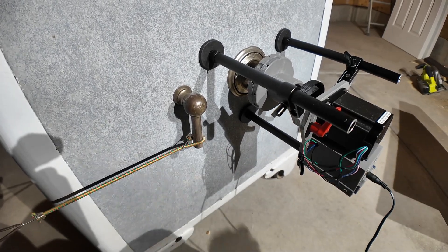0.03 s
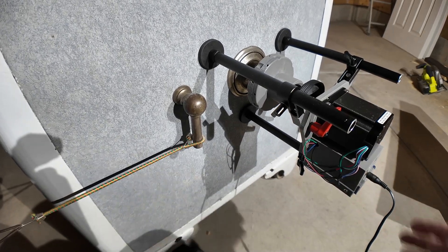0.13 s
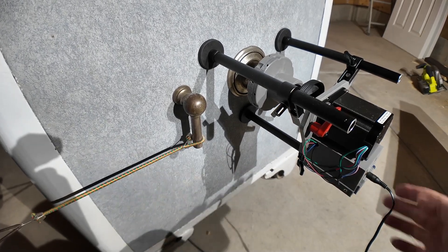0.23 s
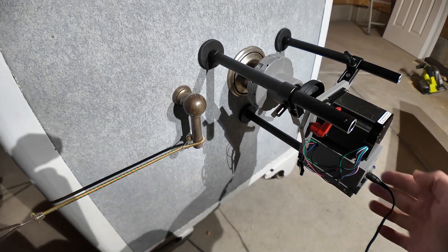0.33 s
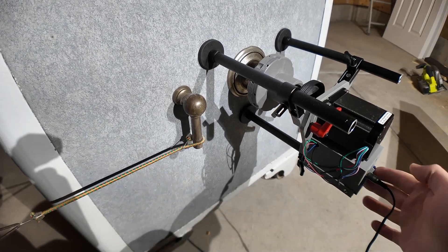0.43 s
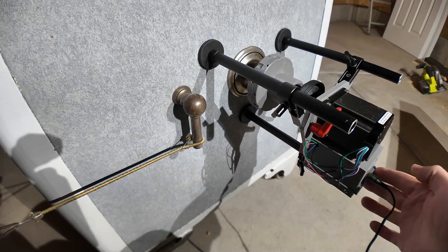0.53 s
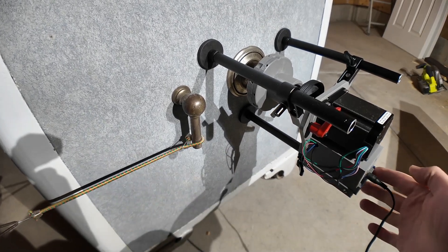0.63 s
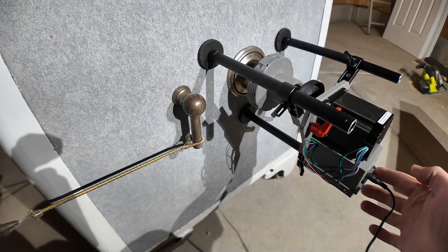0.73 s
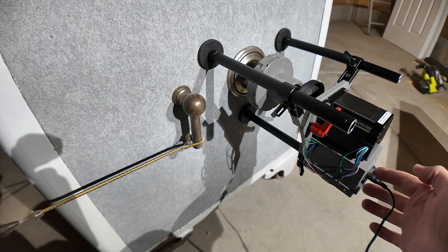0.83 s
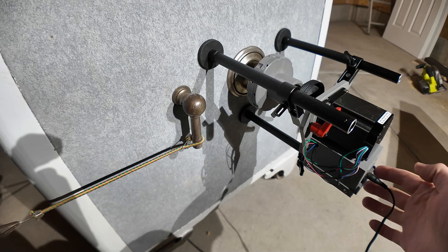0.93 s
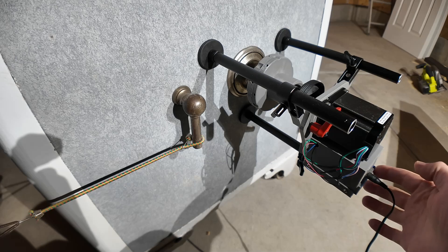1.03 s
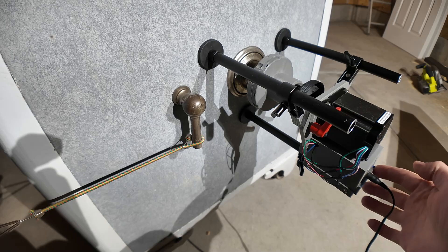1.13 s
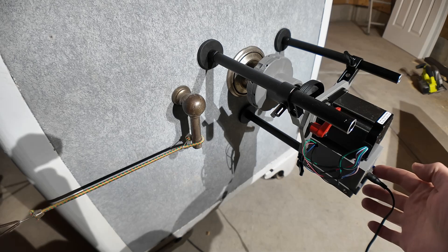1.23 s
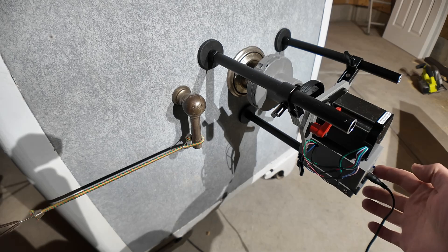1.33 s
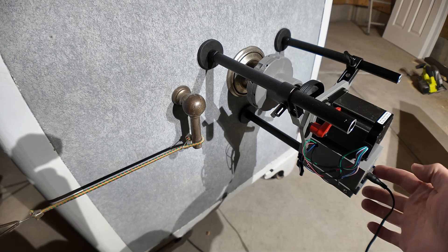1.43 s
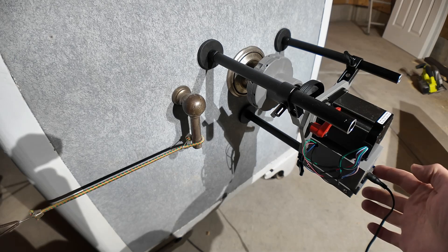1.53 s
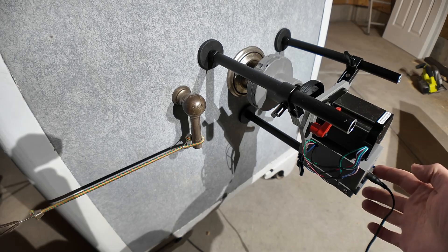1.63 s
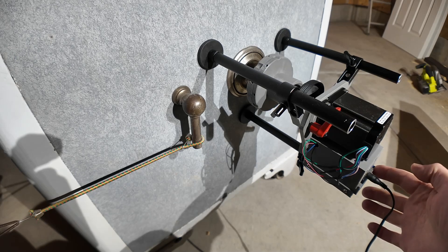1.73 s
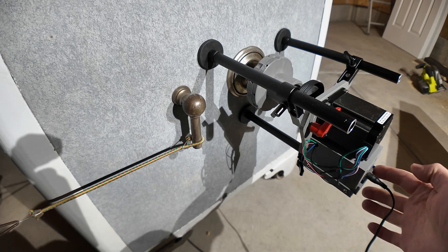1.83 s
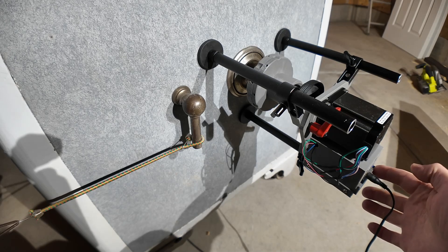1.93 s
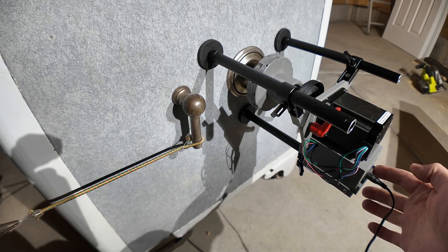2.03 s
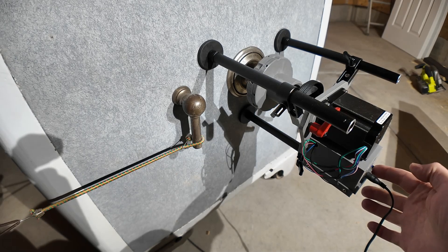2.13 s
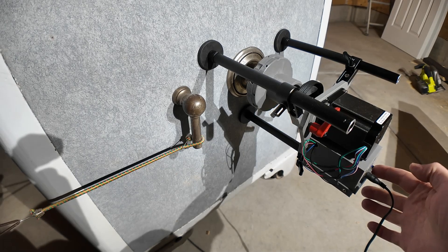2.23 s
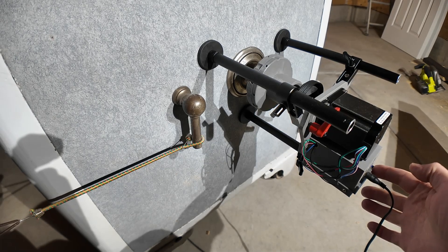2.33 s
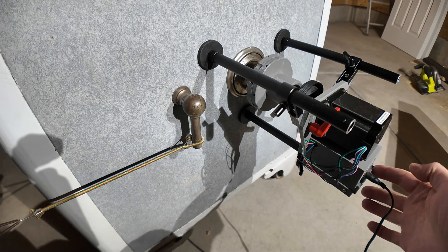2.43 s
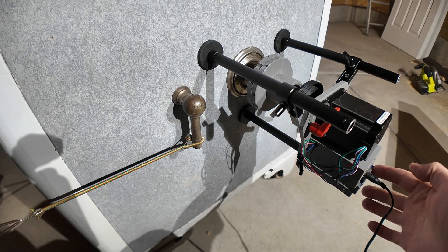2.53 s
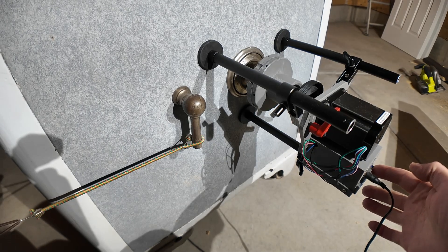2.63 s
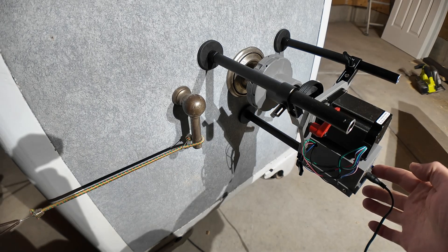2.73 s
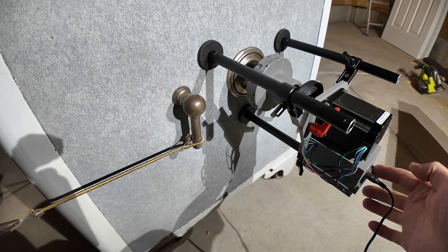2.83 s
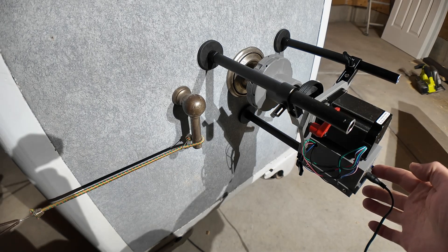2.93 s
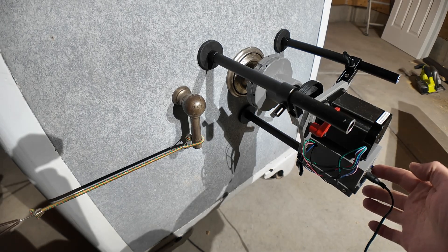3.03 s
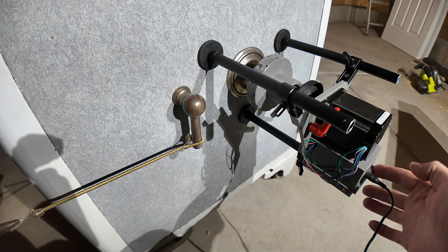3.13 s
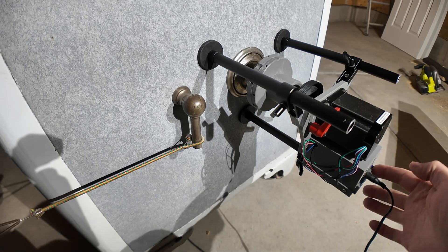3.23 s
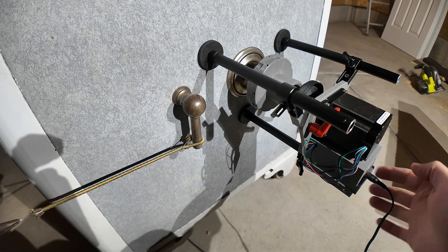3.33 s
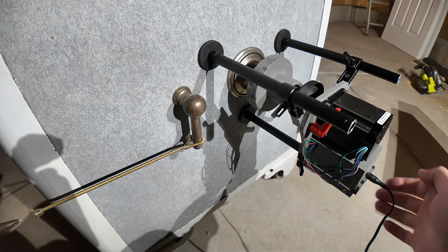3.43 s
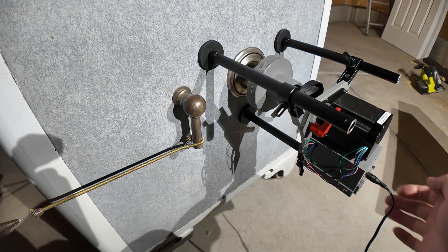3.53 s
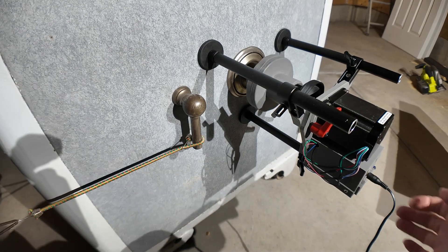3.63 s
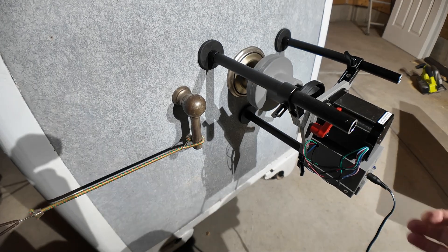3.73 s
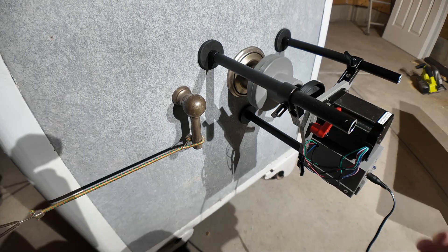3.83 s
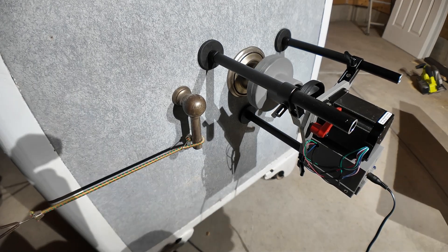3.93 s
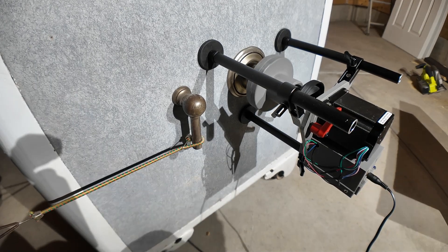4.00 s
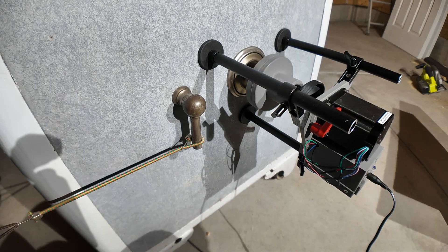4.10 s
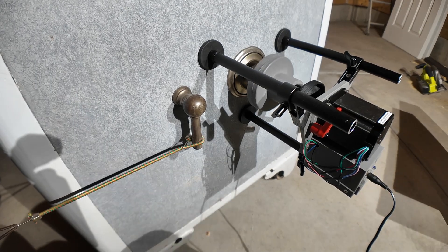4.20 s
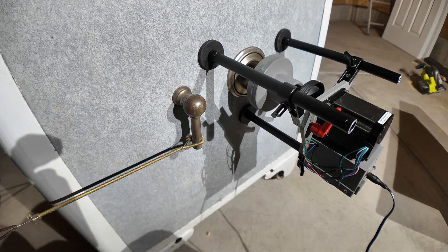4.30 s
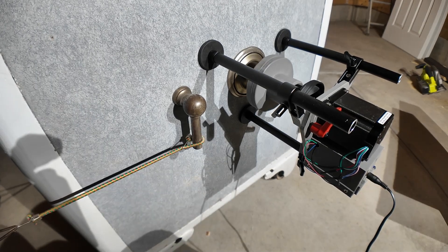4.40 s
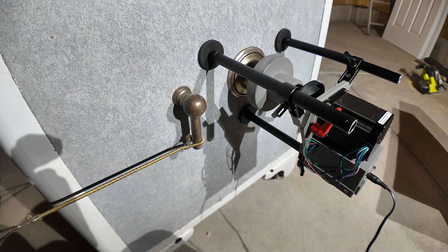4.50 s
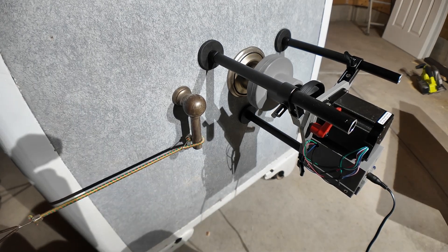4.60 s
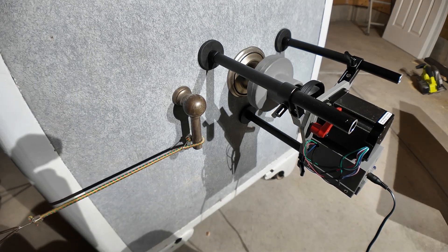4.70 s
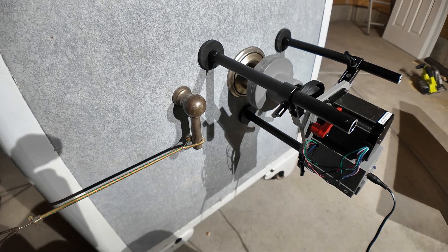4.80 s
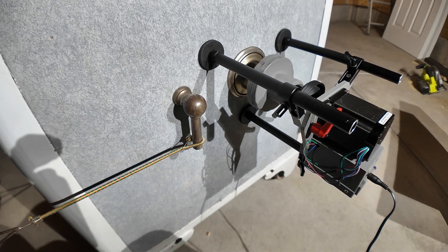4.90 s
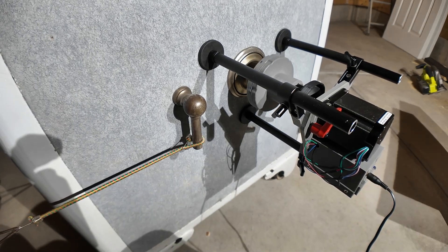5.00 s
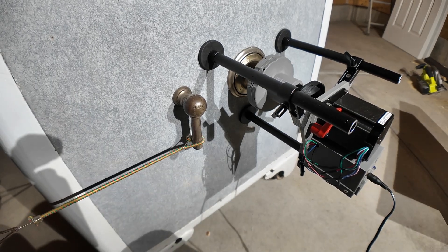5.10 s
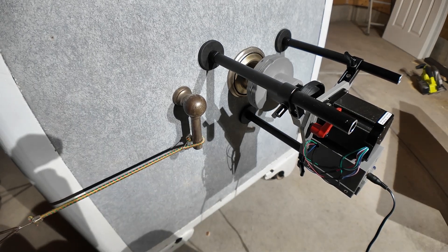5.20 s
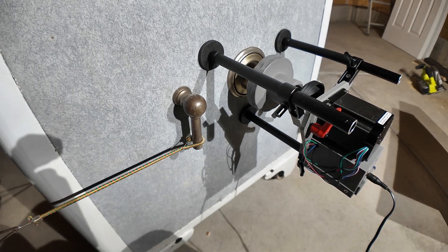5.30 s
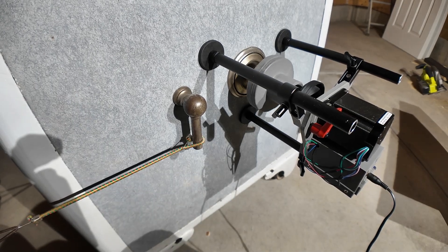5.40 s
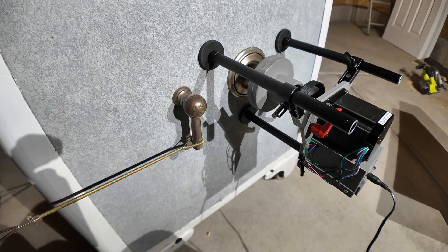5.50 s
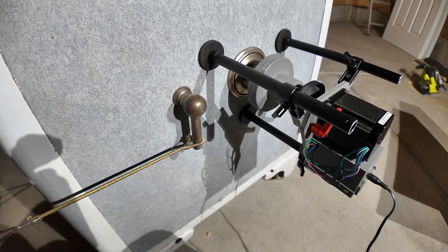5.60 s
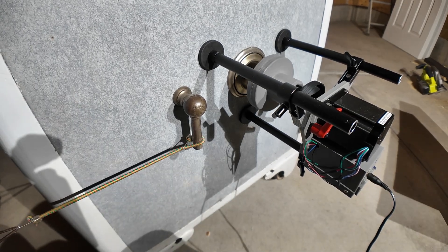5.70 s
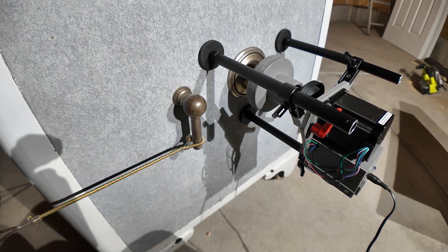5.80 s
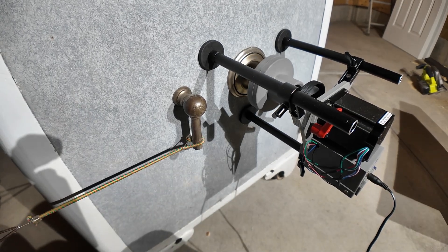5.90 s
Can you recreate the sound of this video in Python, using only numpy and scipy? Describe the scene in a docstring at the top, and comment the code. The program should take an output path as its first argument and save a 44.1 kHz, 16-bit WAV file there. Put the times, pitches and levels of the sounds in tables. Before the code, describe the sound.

Close up, several light plastic and metal clicks with a firmer knock ring briefly through a bracket. Near silence follows, with low room rumble and mains hum. Then a stepper motor buzzes up in pitch, gears chattering and a lock ticking faintly over a thin high whistle. It glides down almost to a stop, rises again and holds its steady whirring whine in a lightly echoing basement.

```python
"""A small stepper motor, clamped to a safe door in a basement, is plugged in and spins the lock dial.
First come filtered-noise air and mains harmonics, then impulses ringing board and bracket as the plug goes in.
The motor creeps, ramps up, cruises, brakes to a creep and ramps up for a second move, cruising to the end:
sines at multiples of the step rate hum and whine through the frame's resonances, random impacts rattle the
gears, impulses and noise bursts make the lock tick and chatter, and the driver whistles and hisses thinly."""
import sys
import numpy as np
from scipy import signal
from scipy.fft import rfft, irfft
from scipy.io import wavfile
from scipy.ndimage import uniform_filter1d

SR = 44100
rng = np.random.default_rng(int(sys.argv[2]) if len(sys.argv) > 2 else 0)


def put_to_file(sound):
    """Save the sound as 16-bit audio at rate SR, in the file named by the first command-line argument."""
    columns = np.atleast_2d(sound).T  # one column per channel
    safe = np.clip(columns, -1, 1)
    whole_steps = np.round(safe * 32767)
    wavfile.write(sys.argv[1], SR, whole_steps.astype(np.int16))


N = 262395
TIME = np.arange(N) / SR
FREQS = np.maximum(np.arange(N + 1) * SR / (2 * N), 1)

# All levels are relative.
# spectrum of the room air: (frequency [Hz], density [dB per Hz])
AIR_SPECTRUM = [(18, -56), (30, -39), (47, -3), (88, -3), (118, -6.5), (149, -13.5), (189, -9),
                (215, -22.5), (259, -17.5), (374, -25), (684, -24.5), (889, -26.5), (3870, -30.5),
                (7870, -39.5), (16000, -37.5)]
AIR_DB = -67.5   # rms level of the air above 410 Hz
# stereo spread of the room air: (frequency [Hz], side minus mid [dB])
AIR_WIDTH = [(60, -13), (110, -10), (200, -3), (380, 5.5), (700, 0.5), (1290, 0), (2380, 0), (4400, 1),
             (8120, 0), (15000, 1)]
# swells of the second mains harmonic: (time [s], length [s], level [dB])
MAINS_SWELLS = [(1.28, 0.12, -62.5), (1.78, .06, -59.5), (2.23, 0.18, -56.5)]
# the third mains harmonic fades in and stays
THIRD_FROM_S, THIRD_FADE_S, THIRD_DB = 2.65, 0.4, -59

# dull thumps of the door: (time [s], length [s], level [dB])
DOOR_THUMPS = [(3.41, 0.03, -50), (3.89, 0.067, -53.5), (4.07, 0.0078, -41.5), (4.105, 0.013, -42)]
# the bracket rings up once: (time [s], length [s], level [dB])
BRACKET_RING = [(4.137, 0.0035, -23)]

# the power plug is pushed home: (time [s], thud level [dB], snap level [dB])
PLUG_CONTACTS = [(0.516, -19, -3), (0.706, 1.5, -5.5), (0.821, 7.5, 13), (1.004, -37, -4), (1.204, 4, -21),
                 (1.212, -12, -2)]
# board and bracket excited by the thud: (frequency [Hz], width [Hz], level [dB])
THUD_MODES = [(598, 57, -3), (744, 83, 7), (1030, 180, -1.5), (1290, 76, -19)]
# board and bracket excited by the snap: (frequency [Hz], width [Hz], level [dB])
SNAP_MODES = [(1190, 170, 5.5), (2300, 880, -3), (3700, 530, -9)]

# ticks of the lock and coupling: (time [s], peak level [dB], treble level [dB])
LOCK_TICKS = [(3.378, -13, -40), (3.389, -27, -17), (3.408, -17.5, -16.5), (3.568, -20, -24),
              (3.624, -14, -26), (3.711, -16, -15.5), (3.778, -9.5, -30), (3.796, -14, -19),
              (3.847, -15, -32), (3.858, -6, -27), (4.173, -19, -35), (4.329, -20, -32),
              (4.362, -11.5, -29), (5.3, -12.5, -25.5), (5.65, -3.5, -52), (5.829, -9, -51),
              (5.875, -18.5, -11.5), (5.925, -9, -39)]
# chatters of the coupling: (time [s], length [s], level [dB])
COUPLING_CHATTER = [(3.381, 0.0036, -40), (3.411, 0.0036, -43), (3.469, 0.0041, -25), (3.78, 0.00092, -39),
                    (5.306, 0.0027, -51), (5.58, 0.0075, -35.5), (5.945, 0.0043, -35.5)]
# resonances of the coupling: (frequency [Hz], width [Hz], level [dB])
COUPLING_MODES = [(2250, 500, 6), (3260, 750, 0.5), (4820, 230, 5), (6300, 460, -4.5), (8600, 840, -15)]

# driver whistles: (lowest pitch before jitter [Hz], swing [Hz], level [dB])
CHOPPER_TONES = [(11890, 430, -57), (14550, 650, -57)]

# moves of the dial, one each way: (start [s], stop [s], rattle level [dB], hum level while speeding up [dB])
DIAL_MOVES = [(3.403, 5.19, 0.5, -6), (5.19, 7.0, -1.5, -2.5)]
# rates in full steps per second; ramping up and braking are equally steep
CREEP_HZ, CRUISE_HZ, RAMP_HZ_PER_S = 12, 531.4, 1240
START_S = 3.376
# the rotor falls behind for an instant and catches up: (time [s], lag [steps])
ROTOR_STUMBLES = [(3.856, 0.6), (3.978, 0.46), (4.161, 0.29), (4.212, 0.5), (4.536, 0.5)]

# spectrum of gears and lock ticks: (frequency [Hz], density [dB per Hz])
GEAR_SPECTRUM = [(380, -28), (520, 2.5), (700, 5), (866, -7), (1090, -2), (1600, 1.5), (1960, -0.5),
                 (2270, 2), (2920, -6.5), (3850, -4.5), (6360, -29.5), (11500, -33.5), (12400, -63),
                 (14000, -47)]
# narrow rings of gears and bracket: (frequency [Hz], width [Hz], level above the rest [dB])
GEAR_MODES = [(684, 26, -40), (1253, 38, 2), (1372, 120, 7), (1620, 45, -19), (1793, 114, -1),
              (2260, 88, -5), (3170, 230, -7.5), (3506, 21, 6.5), (4030, 73, -19), (4430, 160, -8),
              (5200, 150, -1)]
# (dB at full speed before each move's offset, dB lost at a standstill)
CLATTER, RATTLE_BODY, EDGES = (-42, 0), (-34.5, 11.4), (-41.5, 22.5)
# above this step rate the gears break loose; below it they are quieter
LOOSE_HZ, LOOSE_WIDTH_HZ, SEATED_DB = 458, 8.2, -1
# sudden flurries when the gears cross their play:
# (time [s], decay [s], clatter gain [dB], rattle gain [dB])
GEAR_FLURRIES = [(3.376, 0.13, 7, 8), (3.623, 0.04, 6.5, 7.5), (3.778, 0.073, 8, 6), (4.127, 0.012, 10, 1),
                 (4.726, 0.023, 4, 3), (4.914, 0.02, 13, 2.5), (5.151, 0.064, 8.5, 6),
                 (5.576, 0.021, 7.5, 7), (5.645, 0.015, 3, 1), (5.785, 0.015, 0, 8.5)]

# how hard the steps shake the door at full speed: (time [s], hum level [dB])
CRUISE_HUM = [(3.82, -32), (3.944, -29), (3.988, -30), (4.11, -23), (4.142, -23.5), (4.172, -33.5),
              (4.33, -27), (4.38, -30.5), (4.5, -21.5), (4.552, -31.5), (4.59, -25.5), (4.78, -32.5),
              (5.62, -39.5), (5.632, -31), (5.708, -48.5), (5.862, -30), (5.898, -48.5), (5.94, -39.5)]
# how the door answers the step rate on the ramps: (step rate [Hz], hum level [dB])
DOOR_RESPONSE = [(60, -68), (150, -55), (245, -42.5), (320, -57), (400, -47.5), (450, -44), (533, -31)]
# low resonances of the door: (frequency [Hz], width [Hz], level [dB])
LOW_DOOR_MODES = [(87.6, 5, 12.5), (146.6, 2.2, 17)]

# overtones of the hum: (multiple of the step rate, level [dB])
HUM_OVERTONES = [(2, -3), (2.65, -7.5), (3, 2.5), (4, -2), (4.33, -4.5), (5, -4), (6, -3.5), (7, -8),
                 (7.25, -4.5)]
# ripple of the steps and microsteps: (multiple of the step rate, level [dB])
STEP_RIPPLE = [(2, -7), (7, -11.5), (8, 1.5), (9, -11), (16, -4.5), (24, -7.5), (32, -18)]
# resonances of the frame, the last one broad: (frequency [Hz], width [Hz], level [dB])
FRAME_MODES = [(720, 103, -6.5), (844, 97, -16), (1240, 66, -0.5), (1510, 60, -6.5), (2000, 270, -8.5),
               (2790, 32, -9.5), (3240, 170, -9.5), (4170, 190, -19.5), (2270, 2000, -15.5)]
# drive of the whine at full speed, and what it gains at a standstill
WHINE_DB, WHINE_SLOW_DB = -33.5, 5
# the rotor falls into resonance and the whine surges: (time [s], length [s], gain [dB])
WHINE_SURGES = [(3.469, 0.01, 12.5), (3.518, 0.0056, 10.5), (4.931, 0.022, 9), (5.151, 0.043, 5),
                (5.3, .007, 8.5)]

# stereo spread of the machine: (frequency [Hz], side minus mid [dB])
MACHINE_WIDTH = [(60, -13), (110, -28), (200, -5), (380, -17), (700, -8.5), (1290, -10.5), (2380, -4.5),
                 (4400, -5), (8120, 3.5), (15000, -1)]
# stereo balance of the machine: (frequency [Hz], left minus right [dB])
MACHINE_LEAN = [(60, 3.5), (110, -1.5), (200, 0.5), (380, 0), (700, 0.3), (1290, 1), (2380, -0.6),
                (4400, 2), (8120, 2), (15000, -4.5)]
CUTOFF_HZ = 15800


def from_db(db):
    """Logarithmic level: decibels to amplitude gain."""
    return 10 ** (np.asarray(db) / 20)


def rms_one(x):
    """Power normalization: scale to unit mean square."""
    return x / np.sqrt(np.mean(x ** 2) + 1e-20)


def bell(x, centre, width):
    """Gaussian pulse of height one."""
    return np.exp(-.5 * ((x - centre) / width) ** 2)


def swells(rows):
    """Superposed Gaussian envelopes of (time, length, level)."""
    return sum(from_db(db) * bell(TIME, s, length) for s, length, db in rows)


def drift(rate):
    """Slow random modulation: interpolated normal knots, `rate` per second, scaled to unit rms."""
    knots = rng.standard_normal(N)
    return rms_one(np.interp(TIME * rate, np.arange(N), knots))


def at_hz(points):
    """Spectral interpolation in dB along a logarithmic frequency axis."""
    hz, db = np.transpose(points)
    return np.interp(np.log(FREQS), np.log(hz), db)


def colour(x, db):
    """Minimum-phase filtering: a folded cepstrum turns a dB curve into a causal response."""
    cepstrum = irfft(np.log(from_db(db)))
    cepstrum[1:N] *= 2
    cepstrum[N + 1:] = 0
    return irfft(rfft(x, 2 * N) * np.exp(rfft(cepstrum)))[..., :N]


def band(x, edges_hz, kind, order=2):
    """Band limitation by a maximally flat (Butterworth) filter."""
    edges_hz = np.clip(edges_hz, 10, .45 * SR)
    return signal.sosfilt(signal.butter(order, edges_hz, kind, fs=SR, output="sos"), x + 1e-18)


def resonate(x, modes):
    """Modal superposition: parallel damped resonators of (frequency, width, level)."""
    out = 0
    for hz, width, db in modes:
        r = np.exp(-np.pi * width / SR)
        poles = [1, -2 * r * np.cos(2 * np.pi * hz / SR), r * r]
        gain = from_db(db) * (1 - r * r) / 2
        out = out + gain * signal.lfilter([1, 0, -1], poles, x + 1e-18)
    return out


def space(x, ring_s, room_db, room_t60=0.99):
    """Diffuse decay: a dense ring of the metalwork plus the basement's tail, on two unrelated paths."""
    t = TIME[:SR // 2]
    t60 = np.array([ring_s, room_t60])[:, None, None]
    ring, tail = rng.standard_normal((2, 2, len(t))) * from_db(-60 * t / t60)
    response = rms_one(rms_one(ring) + from_db(room_db) * rms_one(tail)) / np.sqrt(len(t))
    return signal.fftconvolve(x[None], response, axes=1)[:, :N]


def stereo(pair, width):
    """Sum and difference: mid and frequency-weighted side paths become left and right."""
    return pair[0] + colour(pair[1], at_hz(width)) * np.array([[1], [-1]])


def basement(mains_hz=59.6, hiss_db=-80, buzz_db=-70):
    """Stationary noise and harmonics: shaped air, faint high hiss, second and third mains harmonics."""
    air = colour(rng.standard_normal((2, N)), at_hz(AIR_SPECTRUM))
    air *= from_db(AIR_DB) / np.std(band(air, 410, "high", order=4))
    hiss = from_db(hiss_db) * rms_one(band(rng.standard_normal((2, N)), [12500, 16000], "band"))
    second = from_db(buzz_db) + swells(MAINS_SWELLS)
    third = from_db(THIRD_DB) * np.clip((TIME - THIRD_FROM_S) / THIRD_FADE_S, 0, 1)
    angle = 2 * np.pi * mains_hz * TIME
    hum = second * np.sin(2 * angle) + third * np.sin(3 * angle)
    return stereo(air, AIR_WIDTH) + hum + hiss


def door(running, rumble_db=-58, thump_body_db=-9):
    """Low-passing by inertia: the heavy door rumbles and thumps in low noise bands; its bracket rings once."""
    shake = rng.standard_normal((2, 2, N))
    boom = rms_one(band(shake[0], [72, 115], "band"))
    body = rms_one(band(shake[1], [110, 520], "band"))
    thumps = (boom + from_db(thump_body_db) * body) * swells(DOOR_THUMPS)
    bracket = swells(BRACKET_RING) * np.sin(2 * np.pi * 725 * TIME) * np.array([[1], [0]])
    return running * (thumps + from_db(rumble_db) * body) + bracket


def plug():
    """Impulse excitation of modes: the plug snaps past the socket's spring and thuds against the board."""
    thuds, snaps = np.zeros((2, N))
    for s, thud_db, snap_db in PLUG_CONTACTS:
        thuds[int(s * SR)] = from_db(thud_db - 10.0)
        snaps[int(s * SR)] = from_db(snap_db - 18.0)
    thud = band(resonate(thuds, THUD_MODES), [420, 1600], "band")
    knock = thud + band(resonate(snaps, SNAP_MODES), 3500, "low", order=4)
    spring = from_db(-26.5) * space(band(snaps, 10000, "high"), ring_s=0.0098, room_db=-18)
    direct = knock * np.array([[.7], [0]])   # mid path only
    return direct + from_db(-2.5) * space(knock, ring_s=0.053, room_db=-6.5, room_t60=0.8) + spring


def contacts(rows, split_hz, treble_db):
    """Contact impulses: each has its own balance of treble to bass."""
    dull, sharp = np.zeros((2, N))
    for s, db, bright_db in rows:
        dull[int(s * SR)] = from_db(db)
        sharp[int(s * SR)] = from_db(db + bright_db + treble_db)
    return band(dull, split_hz, "low") - band(sharp, split_hz, "high")


def lock(tick_db=17.0, chatter_db=0, chatter_side_db=-4):
    """Impact and resonance: the lock's wheels tick as impulses, the coupling chatters as resonant noise."""
    ticks = space(contacts(LOCK_TICKS, split_hz=10100, treble_db=38), ring_s=0.031, room_db=-1)
    ticks = from_db(tick_db) * band(colour(ticks, at_hz(GEAR_SPECTRUM)), 510, "high")
    chatter = rms_one(band(resonate(rng.standard_normal((2, N)), COUPLING_MODES), 1200, "high"))
    return ticks + chatter * swells(COUPLING_CHATTER) * from_db([[chatter_db], [chatter_side_db]])


def driver(steps, speed, jitter_hz=150, hiss_db=-1, strain_hz=330, strain_width_hz=70, strain=0.76):
    """Frequency modulation: two chopper tones jitter and swing with coil current; the upper peaks mid-ramp."""
    pace = speed / CRUISE_HZ
    current = .5 + .5 * pace * np.cos(np.pi * steps)
    lower_load = 1 - .65 * np.exp(-speed / 60)
    upper_load = 0.21 + 0.4 * pace ** 2 + strain * bell(speed, strain_hz, strain_width_hz)
    out = 0
    for (hz, swing, db), load in zip(CHOPPER_TONES, [lower_load, upper_load]):
        pitch = hz + swing * current + jitter_hz * np.array([drift(2400), drift(2700)])
        whistle = np.sqrt(2) * np.sin(2 * np.pi * np.cumsum(pitch, axis=1) / SR)
        hiss = rms_one(band(rng.standard_normal((2, N)), [hz, hz + swing], "band", order=1))
        level = from_db(db + 2.2 * drift(25)) * load
        out = out + level * (whistle + from_db(hiss_db) * pace * hiss)
    return out


def gear_levels(speed, direction_db):
    """Speed-dependent impact: rattle and edges grow with pace and jump as gears loosen; flurries decay."""
    slow = 1 - speed / CRUISE_HZ
    seated_db = SEATED_DB * (.5 - .5 * np.tanh((speed - LOOSE_HZ) / LOOSE_WIDTH_HZ))
    clatter, rattle, edges = (direction_db + db - lost_db * slow for db, lost_db in (CLATTER, RATTLE_BODY, EDGES))
    for s, decay_s, clatter_db, rattle_db in GEAR_FLURRIES:
        flare = (TIME >= s) * np.exp(-abs(TIME - s) / decay_s)
        clatter = clatter + clatter_db * flare
        rattle = rattle + rattle_db * flare
        edges = edges + rattle_db * flare
    return rattle + seated_db, clatter, edges + seated_db


def gears(steps, rattle_db, clatter_db, edge_db, per_s=900, spread_db=2.0, lumpy_db=2.5, shift_db=3.5,
          count=10):
    """Random impact process: loose parts collide, most often on a step's push; frequency ranges take turns."""
    hits = 0
    edges = np.geomspace(550, 15000, count + 1)
    for low, high in zip(edges, edges[1:]):
        born = rng.random(N) < per_s / SR * (1 + .7 * np.cos(2 * np.pi * steps))
        sizes = from_db(spread_db * np.minimum(rng.exponential(1, N), 3) + shift_db * drift(45))
        ring = space(born * sizes * rng.choice([-1, 1], N), ring_s=0.011, room_db=-3.0)
        hits = hits + rms_one(band(ring, [low, high], "band")) * np.sqrt(high - low)
    hits = colour(hits, at_hz(GEAR_SPECTRUM))
    hits = hits + resonate(hits, GEAR_MODES)
    # the motor feeds the rattle evenly, but it comes in short flurries
    envelope = np.sqrt(uniform_filter1d(hits[0] ** 2, size=3000) + 1e-12)
    hits *= from_db(lumpy_db * drift(170)) / envelope
    clatter = rms_one(band(hits, [510, 1150], "band", order=4))
    body = rms_one(band(band(hits, 1474, "high", order=4), 6670, "low", order=6))
    sharp = rms_one(band(hits, 5070, "high", order=4))
    return clatter * from_db(clatter_db) + body * from_db(rattle_db) + sharp * from_db(edge_db)


def motion():
    """Constant acceleration: trapezoidal step rate, and each move's rattle and hum offsets."""
    speed, rattle_db, hum_db = np.full(N, float(CREEP_HZ)), np.zeros(N), np.zeros(N)
    for start, stop, rattle, hum in DIAL_MOVES:
        speed += RAMP_HZ_PER_S * np.maximum(np.minimum(TIME - start, stop - TIME), 0)
        rattle_db[TIME >= start] = rattle
        hum_db[(TIME >= start) & (TIME < (start + stop) / 2)] = hum
    return np.minimum(speed, CRUISE_HZ), rattle_db, hum_db


def step_count(speed, stumble_s=0.003547):
    """Phase as integrated rate: steps taken so far, less the brief lags of the rotor."""
    lag = sum(depth * bell(TIME, s, stumble_s) for s, depth in ROTOR_STUMBLES)
    return np.cumsum(speed) / SR - lag


def step_hum(angle, speed, ramp_db, hum_db=0.56, hunting_db=5.0, ear_phase=0.12, settle_hz=40):
    """Forced vibration: torque ripple shakes the door at the step rate, unevenly as the rotor hunts on ramps."""
    settled = np.exp((speed - CRUISE_HZ) / settle_hz)
    ramping_db = np.interp(speed, *np.transpose(DOOR_RESPONSE)) + ramp_db + hunting_db * drift(80)
    cruising_db = np.interp(TIME, *np.transpose(CRUISE_HUM))
    shake_db = settled * cruising_db + (1 - settled) * ramping_db + hum_db
    hum = np.sqrt(2) * from_db(shake_db) * np.sin(angle + ear_phase * np.array([[1], [-1]]))
    return hum + resonate(hum, LOW_DOOR_MODES)


def motor(angle, speed, rattle_db, overtone_db=-8.0, flutter_db=2.5, jitter_rad=0.026):
    """Source and resonator: eight uneven microsteps per step whine through the frame; gears add overtones."""
    pace = speed / CRUISE_HZ
    overtones = sum(from_db(db + 4.0 * drift(30)) * np.sin(k * angle + 1.18 * drift(25))
                    for k, db in HUM_OVERTONES)
    overtones *= from_db(rattle_db + overtone_db) * pace ** 2
    surge_db = sum(db * bell(TIME, s, length) for s, length, db in WHINE_SURGES)
    whine_db = WHINE_DB + WHINE_SLOW_DB * (1 - pace) + surge_db
    uneven = angle + jitter_rad * drift(400)
    kicks = sum(from_db(db + flutter_db * drift(220)) * np.sin(k * uneven) for k, db in STEP_RIPPLE)
    whine = band(resonate(kicks * from_db(whine_db), FRAME_MODES), [520, 4700], "band", order=3)
    return overtones + whine


def scene(wobble_steps=0.023):
    """Superposition: the room, the plug and the running machine add linearly."""
    speed, direction_db, ramp_db = motion()
    rattle_db, clatter_db, edge_db = gear_levels(speed, direction_db)
    running = np.clip((TIME - START_S) / 0.0011, 0, 1)
    steps = step_count(speed)
    angle = 2 * np.pi * (steps + wobble_steps * drift(70))
    hum = running * step_hum(angle, speed, ramp_db)
    whine = running * motor(angle, speed, rattle_db)
    rattle_and_driver = gears(steps, rattle_db, clatter_db, edge_db) + driver(steps, speed)
    paths = running * rattle_and_driver + lock() + door(running) + plug()
    paths = paths + space(whine, ring_s=0.011, room_db=-7.0) * from_db([[-10], [-2]])
    machine = stereo(paths, MACHINE_WIDTH) + hum + whine
    lean_db = at_hz(MACHINE_LEAN) / 2
    return np.array([colour(machine[0], lean_db), colour(machine[1], -lean_db)]) + basement()


def record(dry):
    """Band-limited transduction: the microphone drops the deep bass and the top is cut steeply."""
    thinned = band(dry, 56, "high", order=4)
    return signal.sosfilt(signal.ellip(12, .1, 80, CUTOFF_HZ, fs=SR, output="sos"), thinned)


dry = scene()
out = record(dry)
put_to_file(out)
```